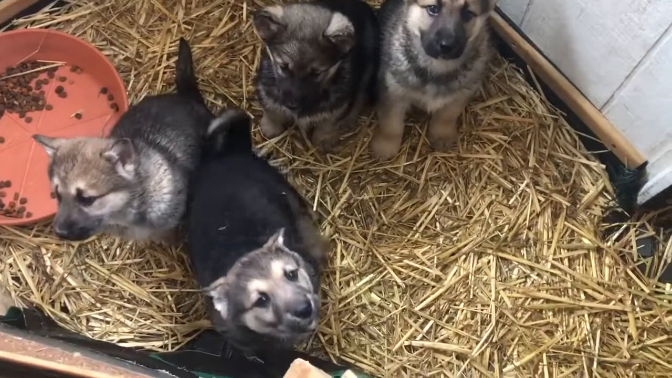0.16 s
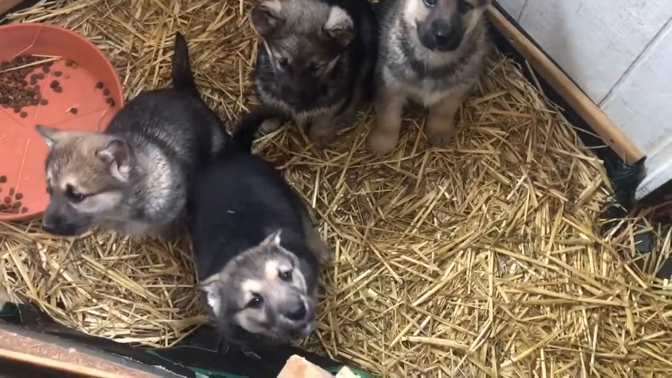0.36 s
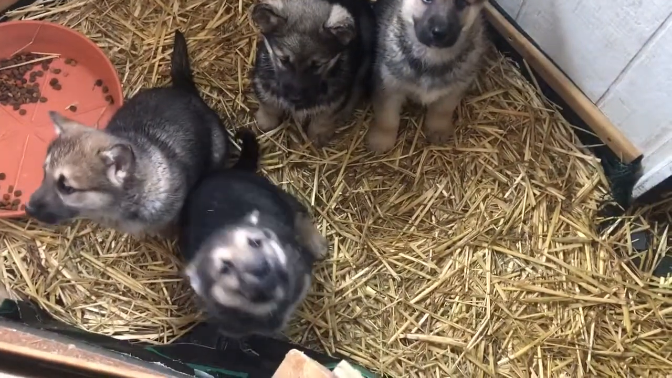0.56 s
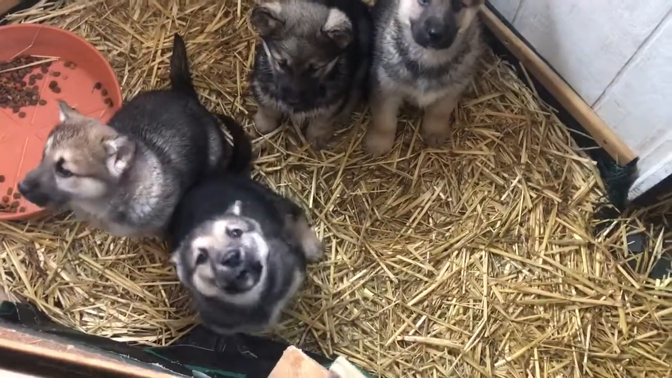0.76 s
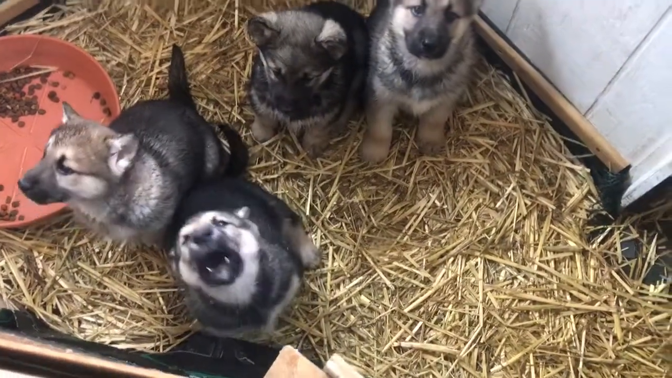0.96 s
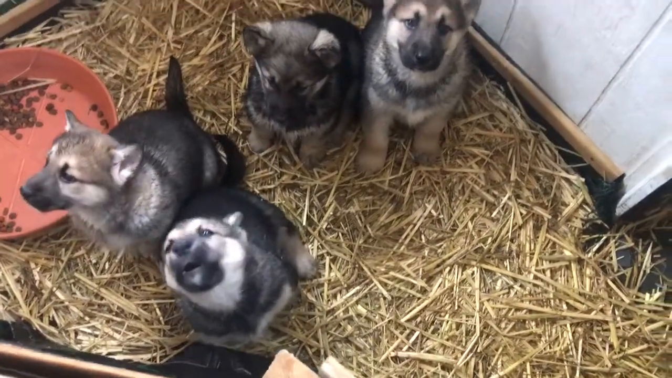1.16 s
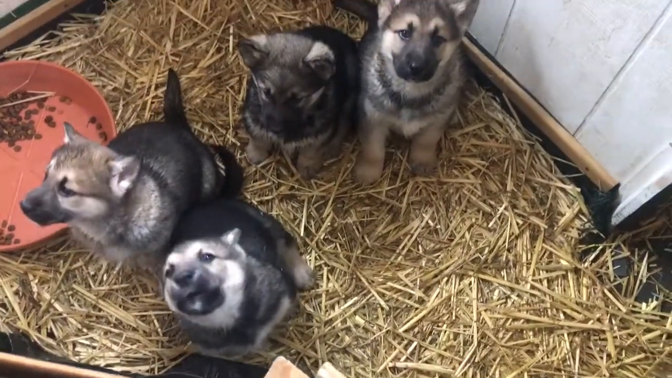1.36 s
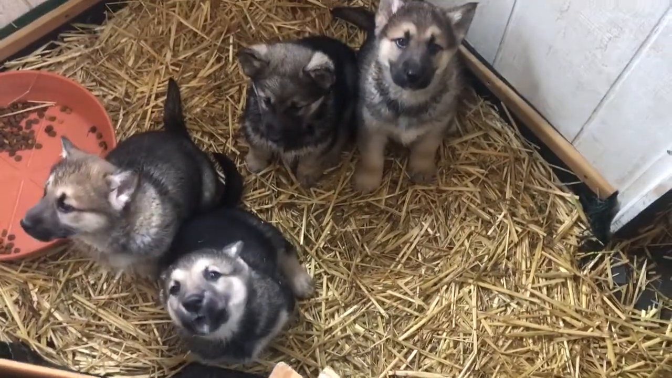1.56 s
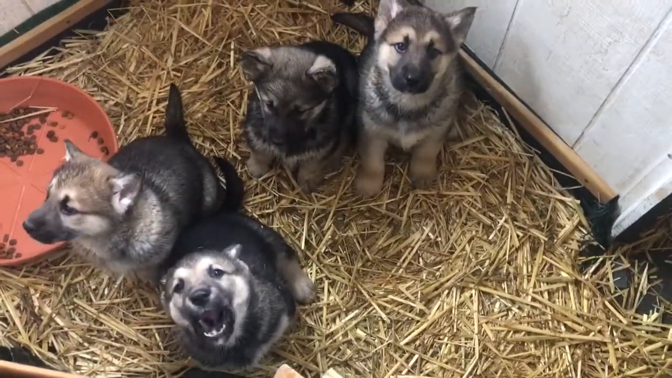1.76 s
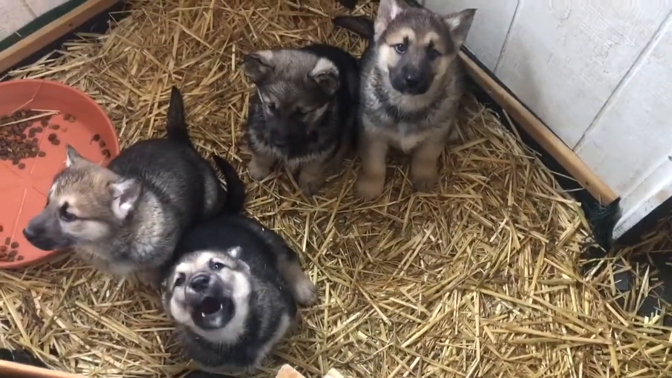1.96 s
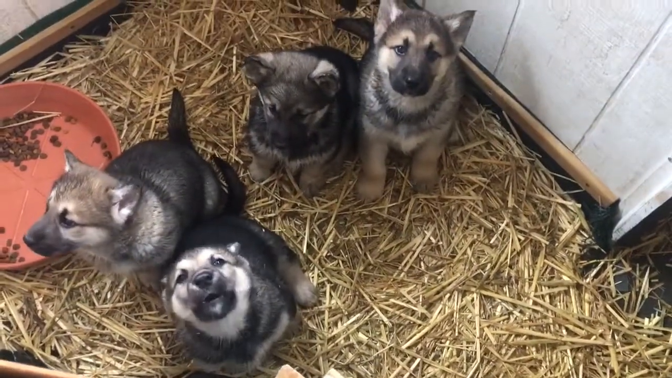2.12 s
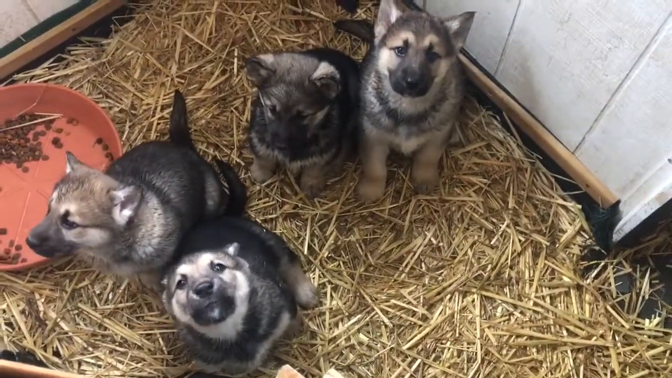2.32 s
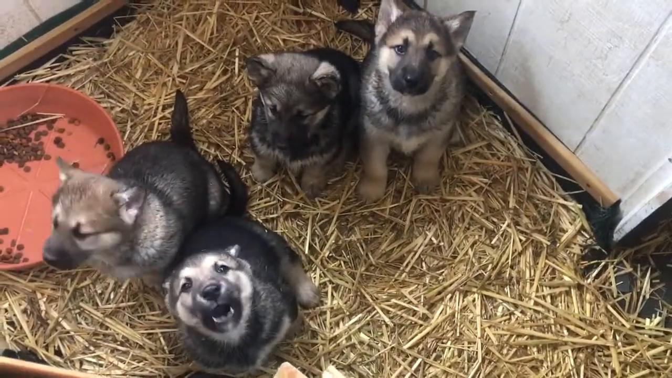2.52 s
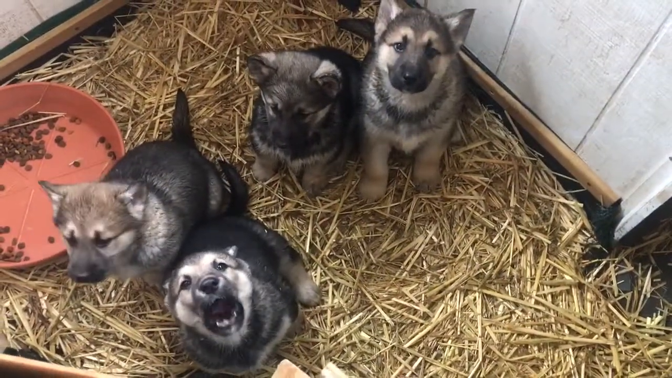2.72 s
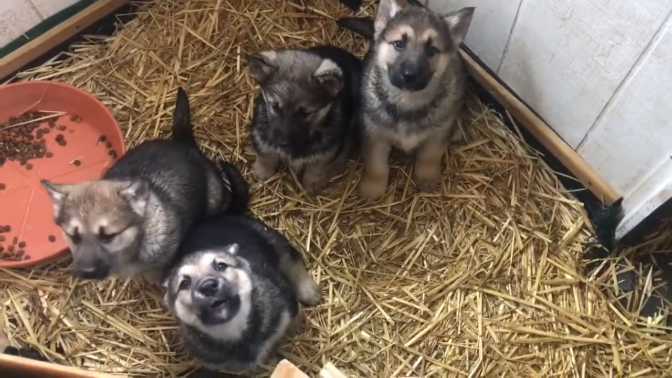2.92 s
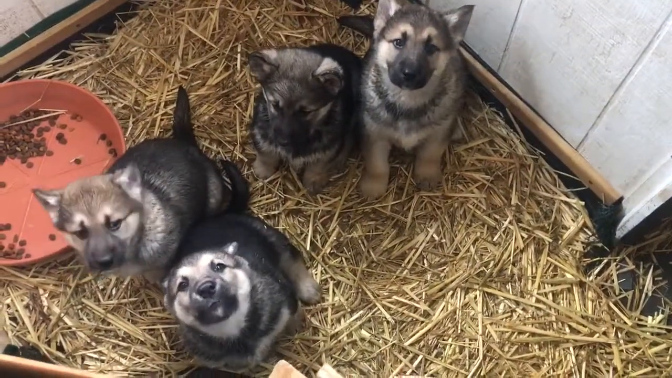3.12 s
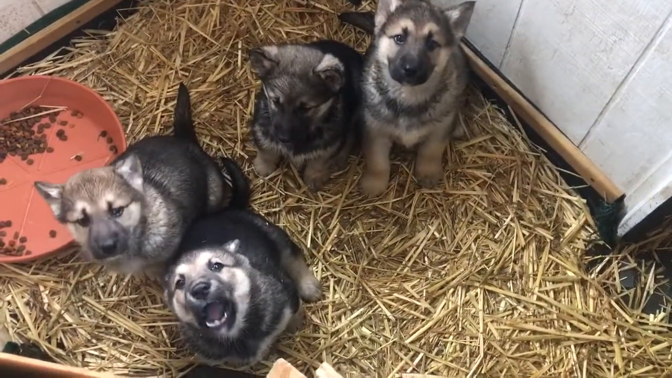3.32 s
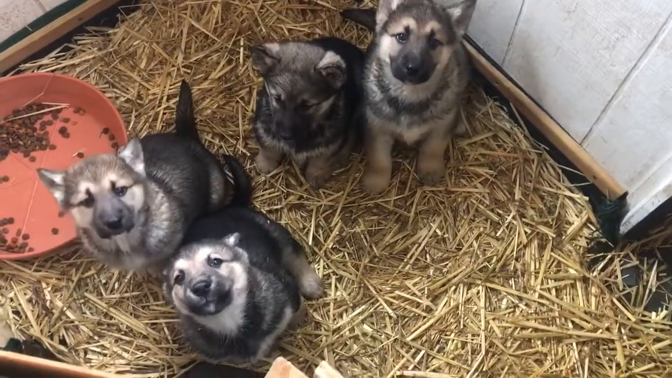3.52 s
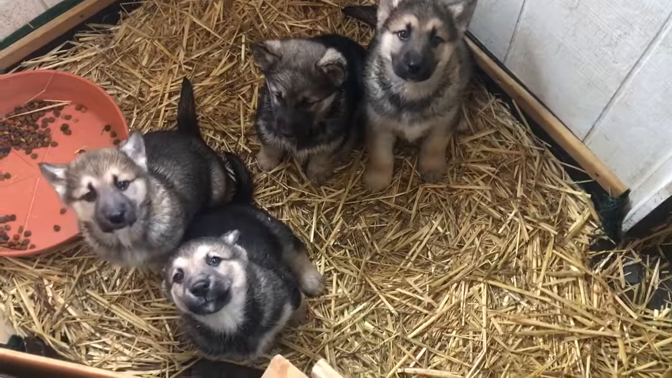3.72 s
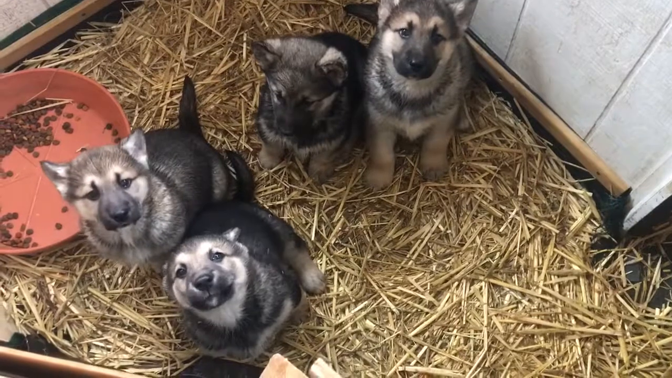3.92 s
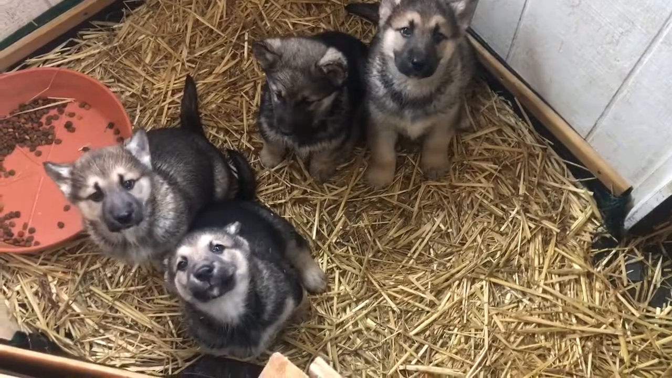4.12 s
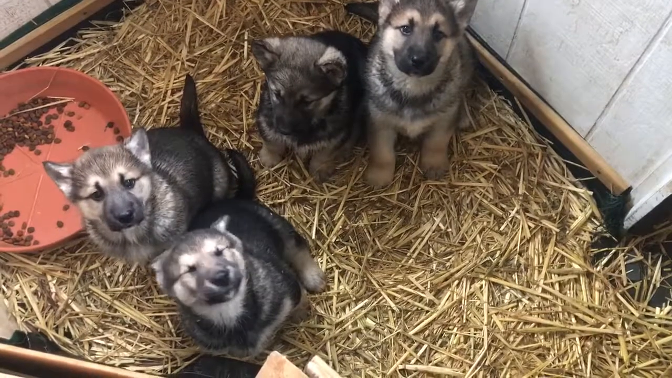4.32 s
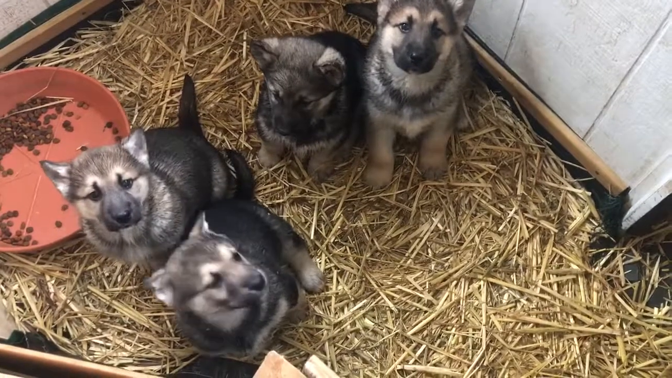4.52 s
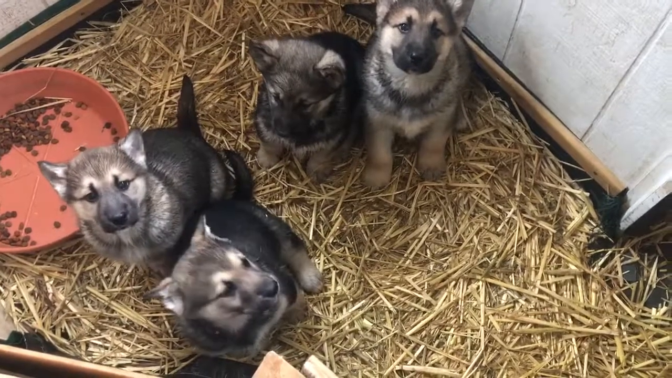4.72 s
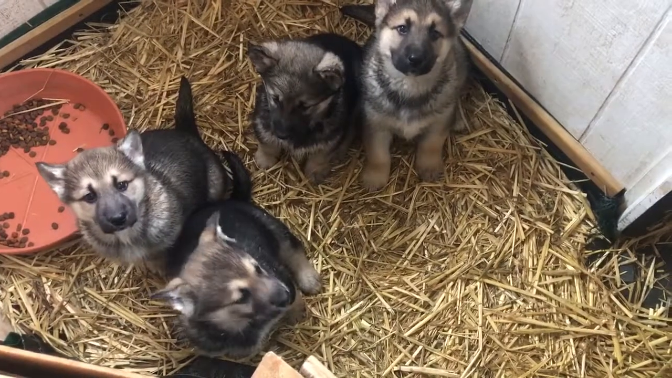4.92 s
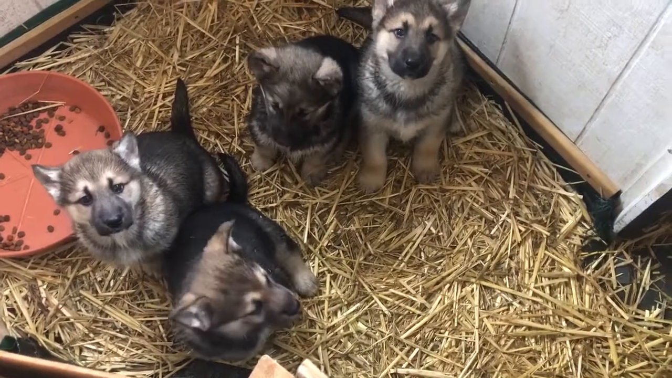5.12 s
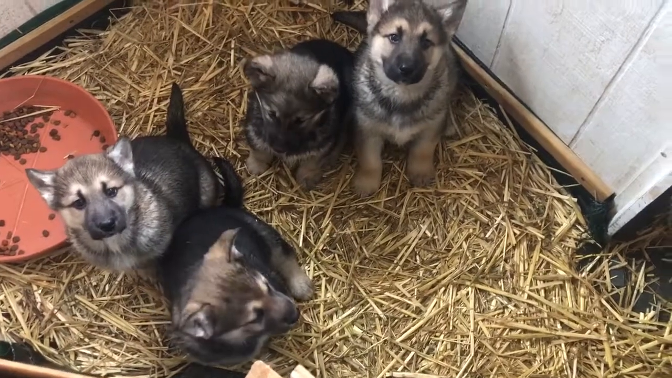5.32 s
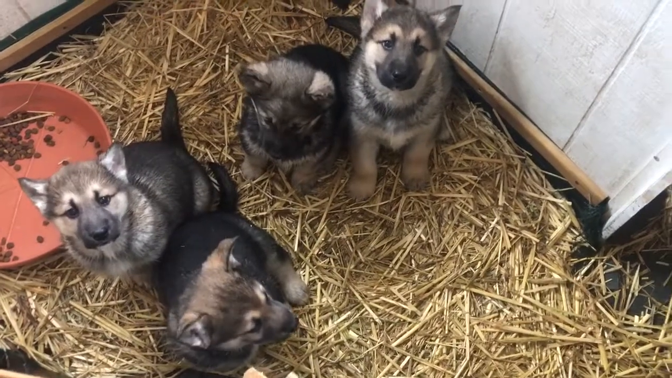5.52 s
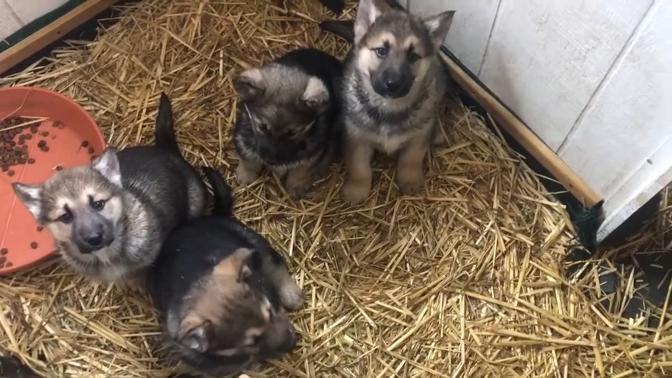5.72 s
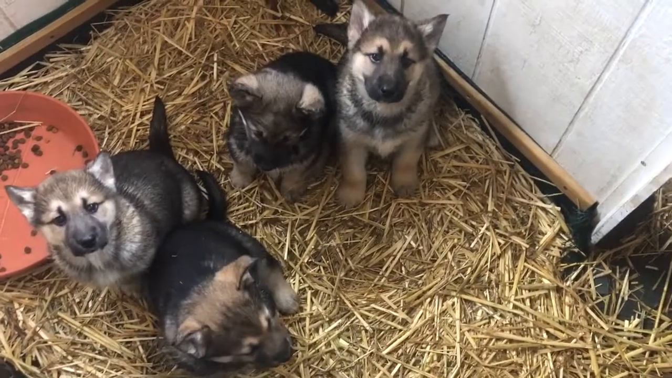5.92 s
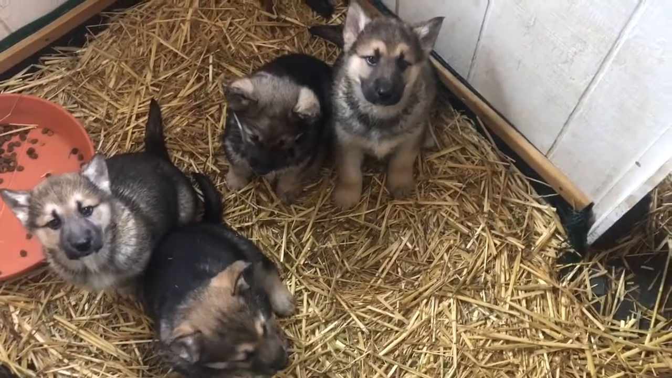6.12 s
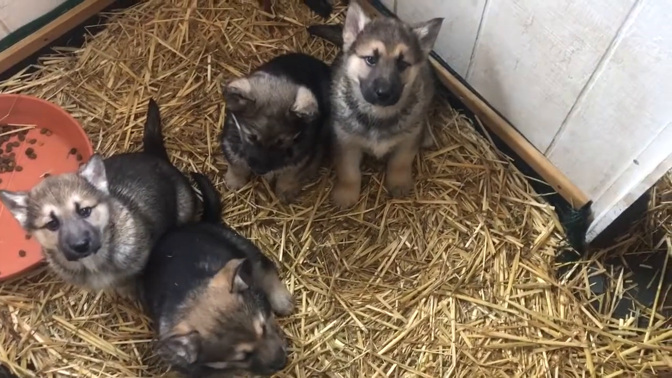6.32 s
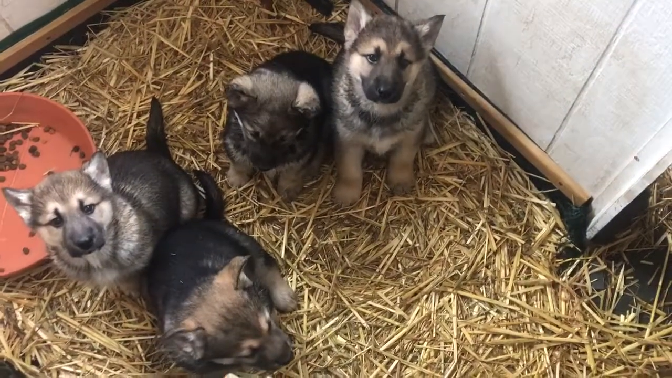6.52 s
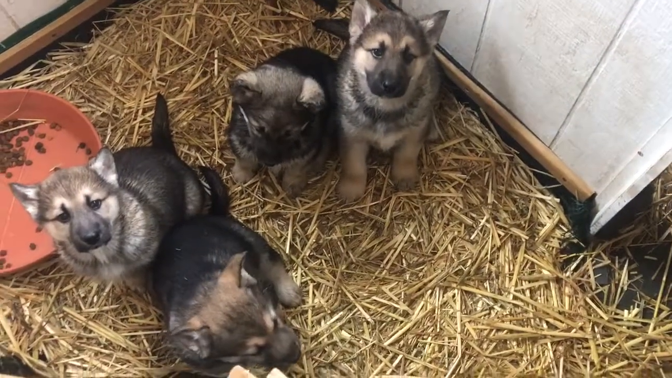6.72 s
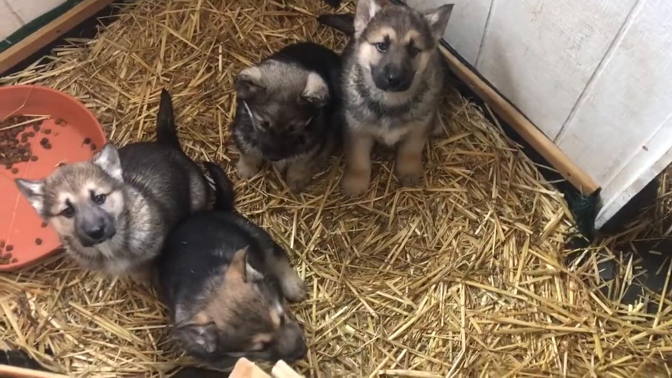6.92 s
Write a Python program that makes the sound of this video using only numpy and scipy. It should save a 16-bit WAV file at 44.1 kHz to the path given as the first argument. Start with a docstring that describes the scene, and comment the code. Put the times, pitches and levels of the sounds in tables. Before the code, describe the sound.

A young puppy whines in strained, swooping cries with squeaky yelps, softening to thin nasal whimpers, while a littermate whimpers in a straw-lined pen.

```python
"""A puppy's strained cry falls and breaks off over a littermate's soft whimper, in a straw-lined pen.
Eleven whines in all: six open-mouthed, four thinner nasal ones, a last open one. Most swoop up, then sink.
Whines are harmonic stacks with resonances, squeals and rasp; whimpers are tones with blurred overtones.
Filtered noise gives straw, air, rumble and knocks; decaying sines give bumps. A tiled room rings briefly."""
import sys
import numpy as np
from scipy import signal
from scipy.fft import rfft, irfft, next_fast_len
from scipy.io import wavfile
from scipy.ndimage import uniform_filter1d

SR = 44100
rng = np.random.default_rng(int(sys.argv[2]) if len(sys.argv) > 2 else 0)


def persist_wave(psi):
    """Save psi, clipped to +-1, as 16-bit WAV."""
    counts = np.round(np.clip(psi, -1, 1) * 32767).astype(np.int16)
    wavfile.write(sys.argv[1], SR, np.atleast_2d(counts).T)


N = 311346
TIME_S = np.arange(N) / SR

# Table levels are relative: gains further down still apply.
# One curve per whine: (time [s], pitch before the final break [Hz], fundamental [dB],
# low overtones [dB], mouth resonance [Hz], treble [dB])
WHINES = [
    [(0.0, 1194, -29, -48, 4900, -35.5), (0.099, 1149, -29.5, -51.5, 2550, -42.5),
     (0.149, 913, -24.5, -40.5, 2590, -44.5), (0.174, 898, -39, -50.5, 2380, -45),
     (0.215, 734, -32, -52, 1560, -63)],
    [(0.354, 884, -36.5, -37, 2220, -38), (0.378, 911, -14, -34, 2300, -44),
     (0.398, 1197, -17.5, -25.5, 2830, -51.5), (0.428, 1216, -18, -44.5, 3280, -43),
     (0.473, 1060, -13, -37, 2530, -53), (0.513, 1115, -18.5, -38, 2540, -50),
     (0.543, 1097, -14, -42, 2590, -50), (0.578, 875, -26, -28.5, 2710, -47),
     (0.643, 771, -17.5, -42.5, 1800, -42), (0.679, 753, -26.5, -15.5, 1350, -49)],
    [(0.795, 569, -27.5, -29.5, 1100, -50), (0.849, 808, -24.5, -27.5, 1300, -50),
     (0.919, 944, -14.5, -25.5, 1170, -47.5), (1.009, 858, -13.5, -37.5, 2000, -51.5),
     (1.044, 775, -22.5, -28.5, 1630, -41), (1.104, 742.4, -17.5, -29, 1480, -48.5),
     (1.21, 734, -20.5, -36, 1780, -51.5), (1.309, 724.4, -22, -35, 2030, -54.5),
     (1.379, 697, -27.5, -26.5, 1380, -53.5), (1.4, 628, -28.5, -23.5, 1450, -58)],
    [(1.538, 592, -32, -35, 1294, -49), (1.577, 789, -25.5, -28.5, 1360, -49),
     (1.597, 1120, -18.5, -34.5, 2100, -43), (1.697, 1146, -12, -21.5, 1900, -39.5),
     (1.712, 1020, -14, -39, 2070, -48.5), (1.792, 993, -22, -47, 2880, -47.5),
     (1.842, 889, -33, -43, 2380, -57.5), (1.905, 760, -28.5, -31, 2040, -48.5),
     (1.967, 673.3, -38, -20.5, 1920, -53), (2.052, 721, -14, -21, 2080, -40),
     (2.162, 682, -31, -20.5, 1670, -40.5), (2.218, 676, -20, -18.5, 1350, -55)],
    [(2.358, 516, -40.5, -41, 903, -41), (2.382, 624.5, -22.5, -30, 1290, -58),
     (2.442, 1043, -22, -37, 2270, -37.5), (2.478, 1083, -25.5, -31.5, 2170, -53),
     (2.512, 1042, -24, -30.5, 2014, -40.5), (2.552, 1076, -20.5, -30, 1850, -38.5),
     (2.587, 967, -13.5, -37, 2420, -39), (2.622, 997, -19, -15.5, 3580, -46),
     (2.662, 913, -26.5, -45, 2970, -47), (2.712, 868, -23, -25.5, 2520, -44.5),
     (2.747, 767.6, -28.5, -14, 1317, -46), (2.792, 680, -32.5, -14, 1370, -39.5),
     (2.86, 684.6, -29.5, -18.5, 1840, -40), (2.952, 694.4, -29.5, -20.5, 2120, -38.5),
     (3.087, 622, -18, -24.5, 1227, -51.5), (3.104, 645, -29, -21, 1574, -57)],
    [(3.241, 512, -32, -27.5, 945, -67), (3.315, 954, -17, -33.5, 2500, -42.5),
     (3.36, 1016, -21, -20, 3280, -48.5), (3.43, 1038, -22.5, -23.5, 2200, -46),
     (3.485, 972, -20, -28.5, 2240, -43), (3.525, 913, -20, -33.5, 2240, -47),
     (3.59, 819, -38, -27, 1550, -49), (3.695, 757, -34, -43, 1430, -55.5),
     (3.765, 650, -32, -32.5, 1200, -53), (3.815, 513, -31.5, -36.5, 1010, -59)],
    [(3.958, 535, -36.5, -44, 850, -90.5), (4.027, 865, -37, -53.5, 1990, -56),
     (4.067, 766.5, -33.5, -44.5, 1610, -49.5), (4.187, 757, -35, -41.5, 1380, -51.5),
     (4.347, 721.8, -30, -49, 2100, -52.5), (4.527, 733, -32, -48.5, 1600, -58),
     (4.592, 721.6, -29.5, -49, 1940, -63), (4.647, 701, -36.5, -44.5, 1320, -55),
     (4.679, 650, -23, -36.5, 1156, -63)],
    [(4.846, 581, -34, -50, 1040, -86.5), (4.915, 884, -40.5, -53, 2150, -45.5),
     (4.935, 736, -36, -48, 1870, -59), (5.08, 706, -38.5, -50.5, 1520, -60),
     (5.195, 684, -51.5, -41, 1320, -61.5), (5.26, 656, -36.5, -47.5, 1760, -55.5),
     (5.345, 622.4, -31, -40.5, 1010, -60.5), (5.455, 592, -25.5, -46, 1020, -59.5),
     (5.519, 602, -40, -43, 1100, -74)],
    [(5.713, 861, -45.5, -57, 2020, -63.5), (5.762, 993, -36.5, -54.5, 2090, -55.5),
     (5.852, 754, -43.5, -53.5, 1880, -65), (5.977, 720, -54, -49.5, 1440, -58),
     (6.112, 687, -41.5, -45.5, 1360, -58.5), (6.147, 566, -32, -49, 1040, -72),
     (6.165, 554, -33.5, -36, 1240, -77)],
    [(6.34, 614, -44.5, -51, 1264, -81.5), (6.394, 1030, -38, -59, 2330, -49),
     (6.46, 962, -37, -61.5, 2170, -55), (6.534, 950, -28, -67, 2010, -53.5),
     (6.554, 945, -38, -55, 2940, -50.5), (6.699, 730, -45, -49, 1810, -59),
     (6.734, 582, -31.5, -50, 1073, -74.5), (6.749, 594, -33.5, -56, 1240, -75)],
    [(6.896, 569, -26, -38, 1270, -70.5), (6.945, 836, -32, -31, 1660, -57.5),
     (6.98, 859, -27.5, -52, 1910, -49), (7.02, 822, -34, -41, 2190, -57),
     (7.06, 881, -19.5, -42.5, 2300, -52)],
]
# One posture per whine: (mouth, throat ring [dB], nose over treble [dB], sheen over treble [dB],
# nose resonance at rest pitch if open, else fixed [Hz], hoarseness [1], final break [0-1])
POSTURES = [("open", -45, 0.87, -8, 5040, .012, .3), ("open", -53.5, -2, -4.5, 5600, 0.0053, 0.31),
            ("open", -51.5, 3.2, -2, 5700, 0.0088, .3), ("open", -54, 0.86, -1.3, 5900, 0.0064, .3),
            ("open", -54, 0, -2, 5700, 0.0059, .3), ("open", -50.5, 0, -3.5, 7900, 0.0037, 0.35),
            ("shut", -50, 0.65, -4, 8670, 0.0048, 0.2), ("shut", -55, 4.7, -10, 5700, 0.011, .3),
            ("shut", -52.5, 6.4, -11, 6500, 0.0078, .3), ("shut", -48, 4.8, -3, 6400, .012, .3),
            ("open", -45, -1, 3, 7700, 0.026, 0)]
# Upper resonances of the head, mouth open and shut: (frequency [Hz], level [dB])
OPEN_HEAD = [(2000, 9), (2600, -0.5), (3300, 6.5), (4300, -8), (5000, -8.5), (5500, 15.5), (6250, -6.5),
             (7250, 5.5), (8200, -8), (9800, 8.5), (11300, 13), (12400, 3.5), (14000, 20.5), (15600, 4.5)]
SHUT_HEAD = [(2400, 16), (3600, 9.5), (4500, 1.5), (5100, -2.5), (5700, 14), (6400, 11), (6900, 10),
             (9500, 12.5), (10400, -3.5), (11500, -1.5), (13000, -4.5), (15500, -12)]
# Throat ringing in yelps and pushes: (centre [s], length [s], ring [dB])
YELPS = [(2.622, 0.034, -38.5), (2.717, 0.06, -17.5), (2.777, 0.053, -20.5), (3.451, 0.035, -23.5),
         (3.555, 0.039, -29), (4.416, 0.26, -42.5), (4.615, 0.13, -44)]
# Second oscillator on strained notes: (start [s], end [s], start pitch [Hz], end pitch [Hz],
# level [dB], its octave over it [dB])
SQUEALS = [(.0, 0.168, 6700, 7830, -43, -19), (0.373, 0.426, 8300, 7000, -37.5, -4),
           (0.388, 0.514, 7160, 7380, -36.5, -17), (0.48, 0.579, 8200, 9500, -45, -14),
           (1.57, 1.71, 7000, 7470, -52, -13), (2.428, 2.59, 7180, 7080, -45, -9),
           (4.005, 4.084, 8970, 7270, -40.5, -8), (4.048, 4.31, 7560, 8000, -47.5, -31),
           (4.896, 4.947, 7660, 6400, -49.5, -17.5), (5.735, 5.87, 6070, 6070, -49.5, -27.5),
           (6.358, 6.567, 6180, 5880, -53, -22)]
# Noise of the vocal folds: (frequency [Hz], level [dB])
RASP_COLOUR = [(500, -22.5), (1200, -2), (2000, -6), (3500, -4), (4600, -7.5), (5900, 4), (6600, -14.5),
               (7400, -13), (8200, -7), (9700, 3), (11500, -4.5), (12700, -8.5), (14300, -7.5),
               (15700, -13.5)]
# Littermate: (start [s], end [s], start pitch [Hz], end pitch [Hz], break [0-1], start [dB], end [dB])
WHIMPERS = [(0, 0.125, 750, 713, 0, -39.5, -48.5), (.75, 0.922, 945, 783, 0.46, -38, -45),
            (1.73, 1.965, 715, 690, 0.32, -57.5, -41.5), (2.305, 2.733, 835, 745, 0.51, -41, -47),
            (2.94, 3.185, 515, 550, 0.02, -32, -67), (4.47, 4.729, 575, 411, 0.08, -46, -41.5)]
# Whimper overtones: (frequency [Hz], level [dB])
WHIMPER_VOICE = [(400, -9), (900, 5), (1400, -4.5), (2200, -30), (3500, -8.5), (4500, -13.5), (9000, -36.5),
                 (15000, -41)]
# Shuffles in the straw: (centre [s], length [s], level [dB])
SHUFFLES = [(0, 0.02, -42.5), (0.29, 0.27, -58), (0.787, 0.13, -59), (1.473, 0.13, -58), (2.97, 0.11, -59),
            (3.601, 0.21, -55.5), (3.825, 0.14, -59), (4.39, 0.11, -59.5), (6.031, 0.23, -59.5),
            (7.026, .3, -61.5)]
# Bedding noise: (frequency [Hz], level [dB])
STRAW_COLOUR = [(90, -13), (170, 1), (320, 8), (700, -36.5), (2000, -27.5), (6000, -9.5), (15000, -28)]
# Still air: (frequency [Hz], density [dB per Hz])
AIR_COLOUR = [(25, -27), (60, -7), (200, -4.5), (500, -13), (800, -8), (1400, -15), (2000, -20.5),
              (3500, -19), (6000, -27), (10000, -27), (15500, -23)]
# Rumble of the building: (time [s], level [dB])
RUMBLE_LEVEL = [(0, -64.5), (3.5, -68.5), (3.9, -58), (7.06, -62.5)]
# Paws on the floor: (time [s], level [dB], pitch [Hz], T60 [s])
BUMPS = [(1.469, -55, 129, .15), (5.975, -35.5, 171.7, 0.13), (5.987, -36, 75, 0.22)]
# Knocks on the boards, and a faint rustle of straw at 6.867 s: (time [s], level [dB], T60 [s])
KNOCKS = [(1.469, -39, 0.079), (6.0092, -27, 0.086), (6.022, -37, 0.31), (6.867, -51.5, 0.69)]
# Resonance of the boards: (frequency [Hz], level [dB])
BOARD_COLOUR = [(100, 7), (400, 8), (800, 4), (1400, 8), (2000, 5), (3000, 1), (4200, -13), (8000, -18.5),
                (15000, -58)]
# Near surfaces of the pen: (delay [ms], level [dB])
ECHOES = [(3.9, -20), (5.9, -35), (9.1, -17), (13.5, -20)]
# Room decay: (frequency [Hz], T60 [s])
ROOM_T60 = [(200, 0.52), (700, 0.14), (1500, 0.2), (4000, 0.13), (9000, 0.15), (15000, 0.016)]
# Room tail spectrum: (frequency [Hz], level [dB])
ROOM_COLOUR = [(200, -6.5), (600, -1), (1000, 1.5), (2000, -1), (5000, 5.5), (9000, -6.5), (15000, -9.5)]

EDGE_HZ = 15750  # band limit
REST_HZ, REST_DB = 800, -40  # pitch and overtone level of an easy whine
NOSE_GLIDE = 0.63  # mouth open: nose resonance follows pitch to this power
MOUTH_DB = 32.5  # mouth resonance: fall one octave away
RING_SHARE = 0.54  # throat ring, dB per dB of overtones
RING_TILT_DB, RING_RISE_DB = -5, 1  # ring per octave of pitch; ring growth along a call
SHEEN_SHARE = 0.12  # sheen, dB per dB of overtones
SCOOP_S, SCOOP_DB, SCOOP_RING_DB = 0.04, -9.5, 0.5  # onset decay time; sheen and ring offsets
BREAK_S = 0.018  # time constant of the final collapse
BREAK_DULL_DB = -1.5  # sheen change at the final break
BREAK_SWELL_DB = 41  # whimper swell for a total collapse
SHUT_FLUTTER, SHUT_RASP_DB = 0.64, -3  # mouth shut: share of flutter kept, rasp offset
CLIMB_DB = 4.5  # mouth shut: change of ring tilt along a call, dB per octave
ENTRY_S = 0.0016  # entry time constant per harmonic number
STRAIN_HOARSE = 0.034  # smear per harmonic number at full strain
AIR_DB, STIR_DB = -61.5, -82  # still air; constant stir of the bedding


def amp(db):
    """Decibels to amplitude gain."""
    return 10 ** (np.asarray(db) / 20)


def unit(x):
    """Scales to rms 1."""
    return x / np.sqrt(np.mean(x ** 2) + 1e-20)


def read(points, hz):
    """Interpolates a table on a log-frequency axis."""
    f, value = np.transpose(points)
    return np.interp(np.log(hz + 1), np.log(f), value)


def add(mix, start_s, sound):
    """Mixes a sound in, in place; cuts it at the end of the mix."""
    part = mix[max(round(start_s * SR), 0):][:len(sound)]
    part += sound[:len(part)]


def colour(x, points):
    """Filters by a spectrum in dB."""
    size = next_fast_len(len(x))
    gain = amp(read(points, np.fft.rfftfreq(size, 1 / SR)))
    return irfft(rfft(x, size) * gain, size)[:len(x)]


def waver(size, hz):
    """Random curve: lines joining Gaussian draws made hz times a second."""
    at = np.arange(size) * hz / SR
    return np.interp(at, np.arange(size // 8), rng.standard_normal(size // 8))


def fuzz(size, hz):
    """Complex noise of rms 1; it widens a tone to a line about hz wide."""
    real = unit(waver(size, hz))
    imaginary = unit(waver(size, hz))
    return np.sqrt(0.5) * (real + 1j * imaginary)


def gate(t, rise_s, fall_s):
    """Soft start and end of a call."""
    ramp = np.minimum((t - t[0]) / rise_s, (t[-1] - t) / fall_s)
    return np.sin(np.pi / 2 * np.clip(ramp, 0, 1)) ** 2


def hump(t, centre_s, length_s):
    """Gaussian swell of height 1."""
    return np.exp(-(2 * (t - centre_s) / length_s) ** 2)


def breaking(t):
    """Rises exponentially to 1 at the end of a call."""
    return np.exp((t - t[-1]) / BREAK_S)


def mouth(hz, mouth_hz):
    """Mouth resonance shares the overtones' power between harmonics 2 and 3."""
    octaves_off = np.log2(np.array([2 * hz, 3 * hz]) / mouth_hz)
    gains = amp(-MOUTH_DB * octaves_off ** 2)
    return gains / np.linalg.norm(gains, axis=0)


def upper_bands(t, hz, overtones_db, treble_db, ring_db, nose_db, sheen_db):
    """Throat ring grows with the overtones and leaps in a yelp; nose and sheen follow the treble."""
    pressed_db = overtones_db - REST_DB
    scoop = np.exp((t[0] - t) / SCOOP_S)
    ring = ring_db + RING_SHARE * pressed_db + RING_TILT_DB * np.log2(hz / REST_HZ)
    ring = ring + RING_RISE_DB * np.linspace(-0.5, 0.5, len(t)) + SCOOP_RING_DB * scoop
    yelps = sum(amp(db) * hump(t, centre_s, length_s) for centre_s, length_s, db in YELPS)
    ring = 20 * np.log10(np.hypot(amp(ring), yelps))
    sheen = treble_db + sheen_db + SHEEN_SHARE * pressed_db
    sheen = sheen + SCOOP_DB * scoop + BREAK_DULL_DB * breaking(t)
    return ring, treble_db + nose_db, sheen


def head(f, spectrum, ring_db, nasal_db, sheen_db, nose_hz, climb_db, ring_top_hz=5000,
         nose_top_hz=10300, nose_width_hz=650, nose_boost_db=9, yelp_db=-39, yelp_range_db=12,
         throat_hz=3100, throat_width_hz=900, focus_db=20):
    """Upper-harmonic gains in three zones: throat ring, moving nose resonance, sheen above it."""
    nose_peak_db = nose_boost_db / (1 + ((f - nose_hz) / nose_width_hz) ** 2)
    shape = amp(read(spectrum, f) + nose_peak_db) * (f < EDGE_HZ + 500)
    above_ring = 0.5 + 0.5 * np.tanh((f - ring_top_hz) / 200)
    above_nose = 0.5 + 0.5 * np.tanh((f - nose_top_hz) / 200)
    # a hard yelp gathers the ring into one or two harmonics
    yelp = np.clip((ring_db - yelp_db) / yelp_range_db, 0, 1)
    focus = focus_db * yelp / (1 + ((f - throat_hz) / throat_width_hz) ** 2)
    throat = amp(focus + climb_db * np.log2(f / throat_hz))
    zones = shape * throat * (1 - above_ring), shape * (above_ring - above_nose), shape * above_nose
    levels_db = ring_db, nasal_db, sheen_db
    return [amp(db) * zone / (np.linalg.norm(zone, axis=0) + 0.15) for db, zone in zip(levels_db, zones)]


def squeal(t, phase, width_hz=220, wander=0.0033, sideband=0.41, second_sideband=0.083, ramp_s=0.023):
    """A whistle far above the pitch; the folds chop it into sidebands."""
    out = np.zeros(len(t))
    chop = unit(1 + 2 * sideband * np.cos(phase) + 2 * second_sideband * np.cos(2 * phase))
    for start, end, start_hz, end_hz, db, octave_db in SQUEALS:
        if t[0] < (start + end) / 2 < t[-1]:
            hz = np.interp(t, [start, end], [start_hz, end_hz]) * (1 + wander * waver(len(t), 90))
            turn = np.exp(2j * np.pi * np.cumsum(hz) / SR)
            tone = (turn + amp(octave_db) * turn ** 2) * (1 + fuzz(len(t), width_hz))
            envelope = np.clip(np.minimum(t - start, end - t) / ramp_s, 0, 1)
            out += amp(db) * tone.real * chop * envelope
    return out


def rasp(phase, treble_db, strain, level_db=-11.5, strained_db=7, puff=0.64):
    """Air rushing between the folds, puffed once a cycle, fills the gaps between harmonics."""
    puffs = rng.standard_normal(len(phase)) * (1 + puff * np.cos(phase))
    return amp(treble_db + level_db + strained_db * strain) * unit(colour(puffs, RASP_COLOUR))


def whine(rows, posture, tremor=0.0017, jitter=0.0016, swoop_jitter=0.021, swoop_rate=4.6,
          flutter_db=4.5, swoop_flutter_db=3.5, flutter_hz=70, swoop_hoarse=0.018, strain_db=-2,
          rise_s=0.0016, fall_s=0.0073, fundamental_db=1.9, overtone_db=0.62, count=30):
    """Vocal folds give a harmonic stack that turns rough where the pitch swoops or strains."""
    time_s, *columns = np.transpose(rows)
    t = np.arange(time_s[0], time_s[-1], 1 / SR)
    size = len(t)
    hz, first_db, overtones_db, mouth_hz, treble_db = (np.interp(t, time_s, c) for c in columns)
    opening, *band_db, nose_hz, hoarse, collapse = posture
    is_open = opening == "open"
    overtone_gains = amp(overtones_db + overtone_db) * mouth(hz, mouth_hz)
    lower = np.vstack([amp(first_db + fundamental_db), overtone_gains])
    ring, nasal, sheen = upper_bands(t, hz, overtones_db, treble_db, *band_db)
    nose_hz = nose_hz * (hz / REST_HZ) ** (NOSE_GLIDE * is_open)

    hz = uniform_filter1d(hz * (1 - collapse * breaking(t)), 300, mode="nearest")
    glide_rate = abs(np.gradient(np.log(hz))) * SR  # 1/s
    swoop = np.tanh(uniform_filter1d(glide_rate, 600) / swoop_rate) ** 2
    strain = np.clip((hz - 900) / 250, 0, 1)
    hz = hz * (1 + tremor * waver(size, 60) + (jitter + swoop_jitter * swoop) * waver(size, 260))
    phase = 2 * np.pi * np.cumsum(hz) / SR

    # gains every 64 samples; strain lowers the nose band, where the squeal takes over
    slow = slice(None, None, 64)
    f = np.arange(4, count + 1)[:, None] * hz[slow]
    climb_db = np.linspace(-0.5, 0.5, f.shape[1]) * (0 if is_open else CLIMB_DB)
    upper = head(f, OPEN_HEAD if is_open else SHUT_HEAD, ring[slow], (nasal + strain_db * strain)[slow],
                 sheen[slow], nose_hz[slow], climb_db)
    gains = np.vstack([lower[:, slow], sum(upper)])

    rasp_db = (nasal + sheen) / 2 + (0 if is_open else SHUT_RASP_DB)
    voice = squeal(t, phase) + rasp(phase, rasp_db, strain)
    flutter_depth_db = flutter_db * (1 if is_open else SHUT_FLUTTER) + swoop_flutter_db * swoop
    for k, gain in enumerate(gains, 1):
        # turbulence smears the higher harmonics more
        smear = np.tanh(k * (hoarse + swoop_hoarse * swoop + STRAIN_HOARSE * strain))
        carrier = np.exp(1j * (k * phase + 2 * np.pi * rng.random()))
        line = (np.sqrt(1 - smear ** 2) + smear * fuzz(size, 650)) * carrier
        flutter = flutter_depth_db * np.tanh(k / 2) * waver(size, flutter_hz)
        # short waves beam unevenly as the head turns
        beaming = np.clip((k - 4) / 5, 0, 1) * (3.5 * waver(size, 11) - 1)
        entry = 1 - np.exp((t[0] - t) / (k * ENTRY_S))
        level = np.interp(t, t[slow], gain) * amp(flutter + beaming)
        voice += np.sqrt(2) * entry * level * line.real
    return time_s[0], voice * gate(t, rise_s, fall_s)


def whimper(start, end, start_hz, end_hz, collapse, start_db, end_db, jitter=0.003,
            overtone_db=-9, blur_hz=90, count=14):
    """A soft closed-mouth whistle with blurred overtones; it glides evenly, then breaks and swells."""
    t = np.arange(start, end, 1 / SR)
    size = len(t)
    drop = collapse * breaking(t)
    hz = np.linspace(start_hz, end_hz, size) * (1 - drop) * (1 + jitter * waver(size, 290))
    phase = 2 * np.pi * np.cumsum(hz) / SR
    voice = np.cos(phase)
    for k in range(2, count + 1):
        line = (fuzz(size, blur_hz) * np.exp(1j * k * phase)).real
        voice += amp(read(WHIMPER_VOICE, k * hz) + overtone_db) * line
    db = np.linspace(start_db, end_db, size) + BREAK_SWELL_DB * drop
    return start, np.sqrt(2) * voice * amp(db) * gate(t, 0.034, 0.0087)


def straw(level_db=-2, snaps_per_s=60, snap_db=17):
    """Bodies shuffle in the bedding as swells of noise; sparse impulses are ticking stalks."""
    snaps = (rng.random(N) < snaps_per_s / SR) * rng.standard_normal(N) * amp(snap_db)
    swells = sum(amp(db) * hump(TIME_S, centre_s, length_s) for centre_s, length_s, db in SHUFFLES)
    rustle = unit(colour(rng.standard_normal(N) + snaps, STRAW_COLOUR))
    return amp(level_db) * (amp(STIR_DB) + swells) * rustle


def background(air_db=-3, rumble_db=-2):
    """Still air and a low rumble of the building, both filtered noise."""
    # (frequency [Hz], level [dB])
    rumble_colour = [(22, -41.0), (45, -8.5), (68, 0.0), (90, -26.5), (130, -24.0), (400, -87.5)]
    rumble = unit(colour(rng.standard_normal(N), rumble_colour))
    air = unit(colour(rng.standard_normal(N), AIR_COLOUR))
    rumble_level_db = np.interp(TIME_S, *np.transpose(RUMBLE_LEVEL)) + rumble_db
    return amp(AIR_DB + air_db) * air + amp(rumble_level_db) * rumble


def pen():
    """Paw bumps are decaying sines; knocks on the boards and a late straw rustle are decaying filtered noise."""
    out, t = np.zeros(N), np.arange(SR // 2) / SR
    for start_s, db, hz, t60_s in BUMPS:
        attack = 1 - np.exp(-t / 0.0012)
        add(out, start_s, 2 * amp(db - 60 * t / t60_s) * np.sin(2 * np.pi * hz * t) * attack)
    for start_s, db, t60_s in KNOCKS:
        knock = unit(colour(rng.standard_normal(len(t)), BOARD_COLOUR))
        add(out, start_s, amp(db - 60 * t / t60_s) * knock)
    return out


def room(x, wet_db=-12, delay_s=0.007):
    """Direct sound, a few near echoes, then sparse taps of random sign that die band by band."""
    size = SR // 2
    taps = rng.choice([-1., 1.], size) * (rng.random(size) < 3000 / SR)  # 3000 per s
    hz, t, bands = signal.stft(taps, SR, nperseg=256)
    decay = amp(-60 * t / read(ROOM_T60, hz)[:, None])
    tail = signal.istft(bands * decay, SR, nperseg=256)[1][:size]
    tail = unit(tail) / np.sqrt(size)  # unit energy
    response = np.zeros(size)
    response[0] = 1
    add(response, delay_s, amp(wet_db) * colour(tail, ROOM_COLOUR))
    for delay_ms, db in ECHOES:
        add(response, delay_ms / 1000, amp([db]))
    return signal.fftconvolve(x, response)[:N]


def scene():
    """Puppies, bumps and knocks ring in the room; straw and background are added dry."""
    near = np.zeros(N)
    for rows, posture in zip(WHINES, POSTURES):
        add(near, *whine(rows, posture))
    for row in WHIMPERS:
        add(near, *whimper(*row))
    near += pen()
    return (amp(-2.37) * room(near) + straw() + background())[None]


def record(dry):
    """Linear-phase low-pass at the band limit."""
    lowpass = signal.firwin(511, EDGE_HZ, window=("kaiser", 9), fs=SR)
    return signal.oaconvolve(dry, lowpass[None], "same")


dry = scene()
out = record(dry)
persist_wave(out)
```